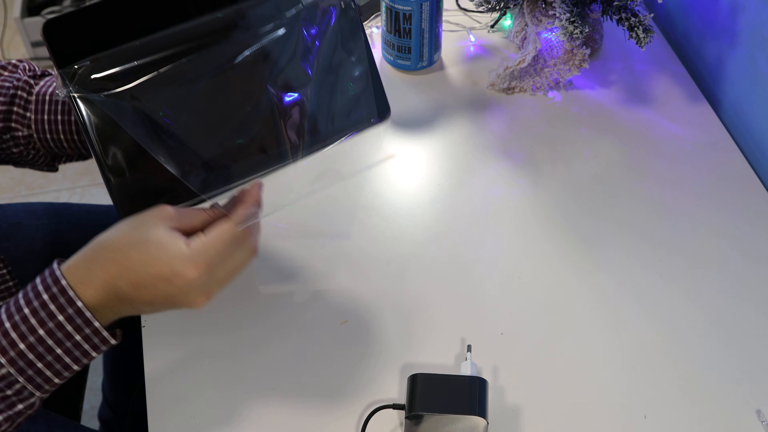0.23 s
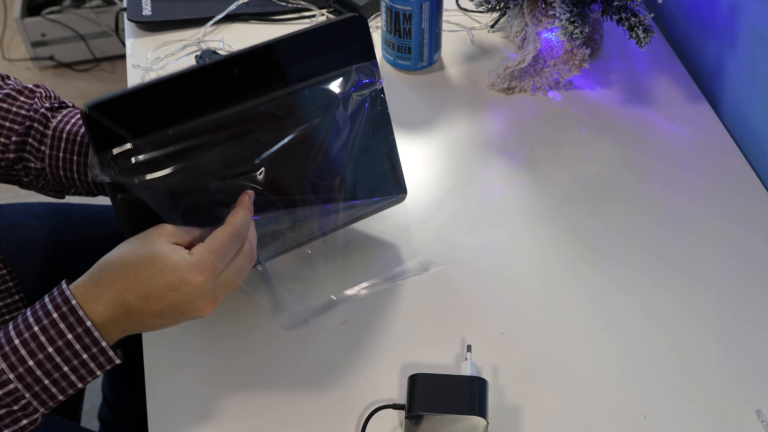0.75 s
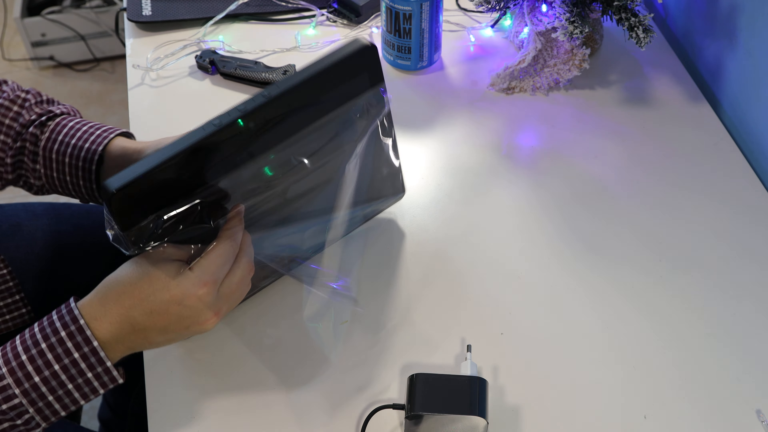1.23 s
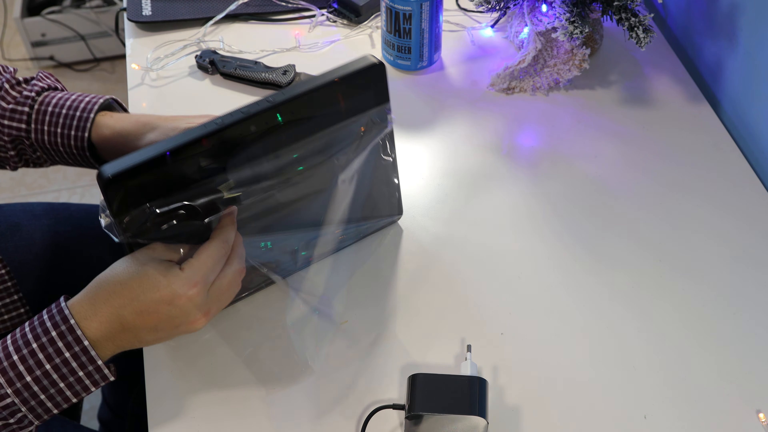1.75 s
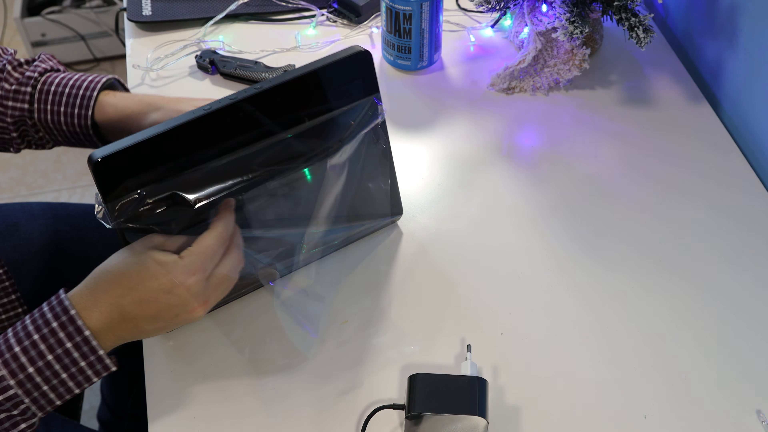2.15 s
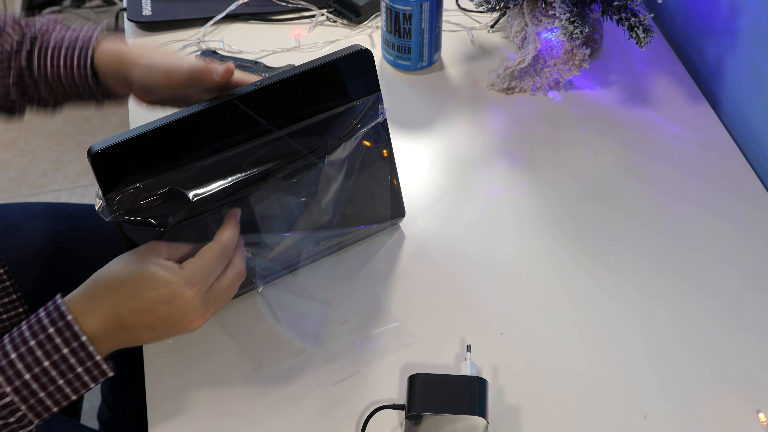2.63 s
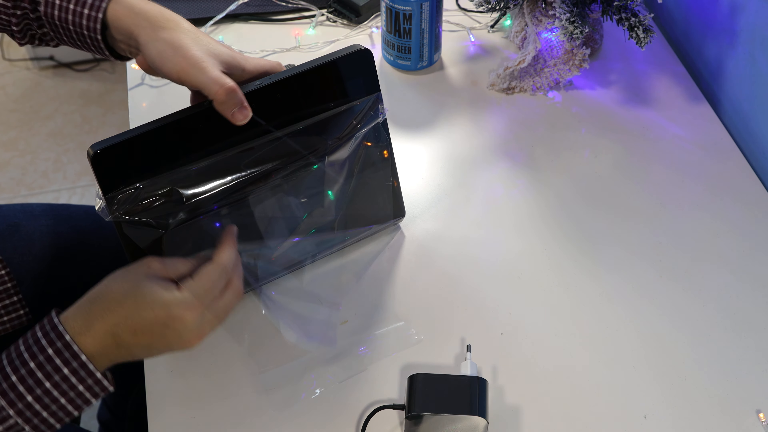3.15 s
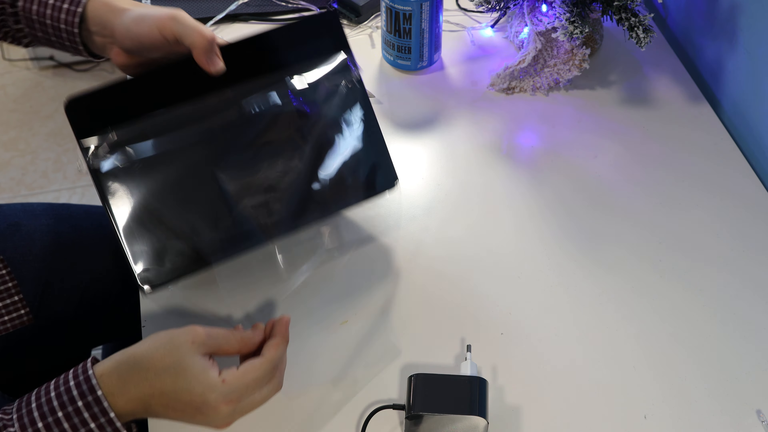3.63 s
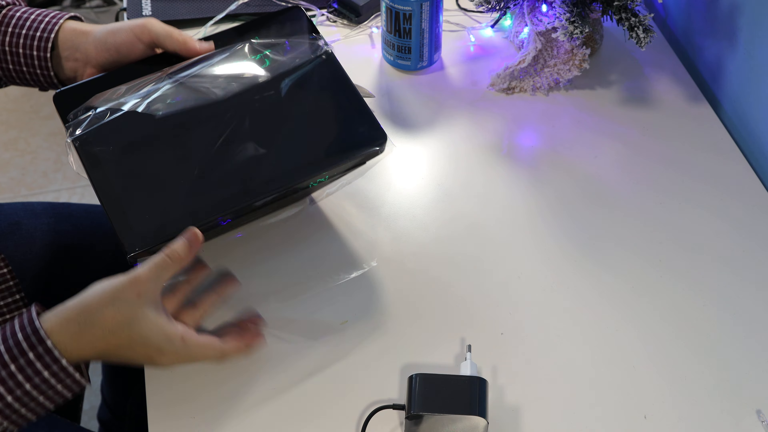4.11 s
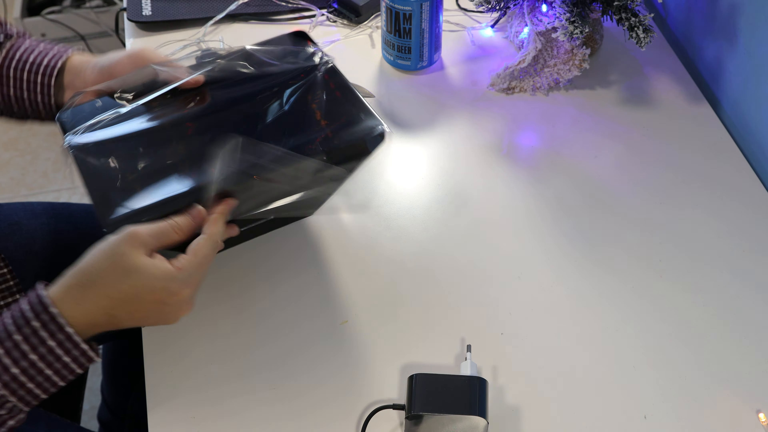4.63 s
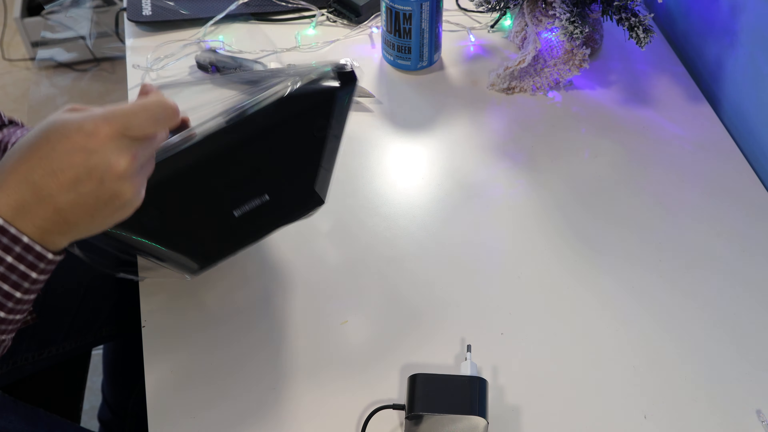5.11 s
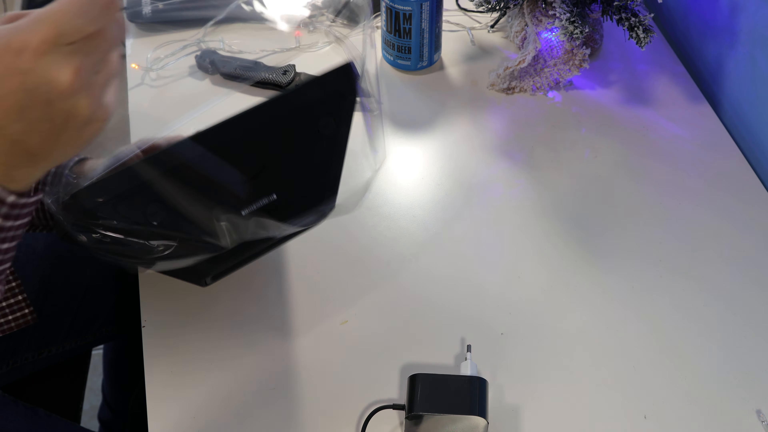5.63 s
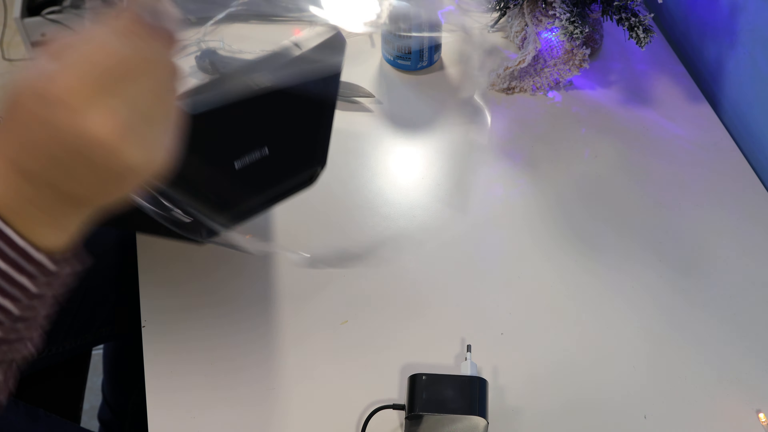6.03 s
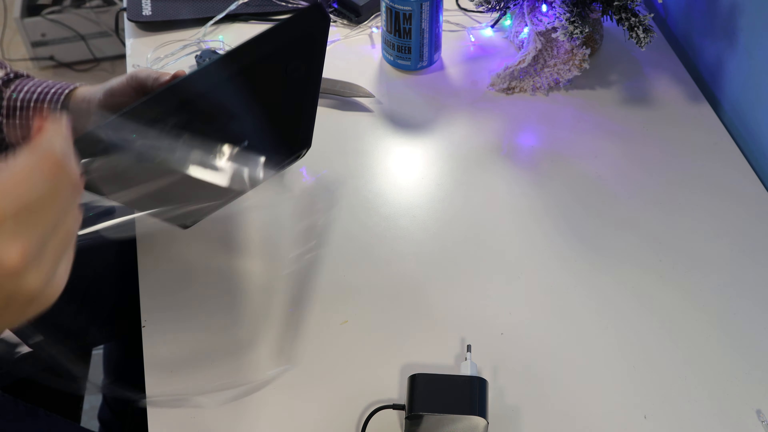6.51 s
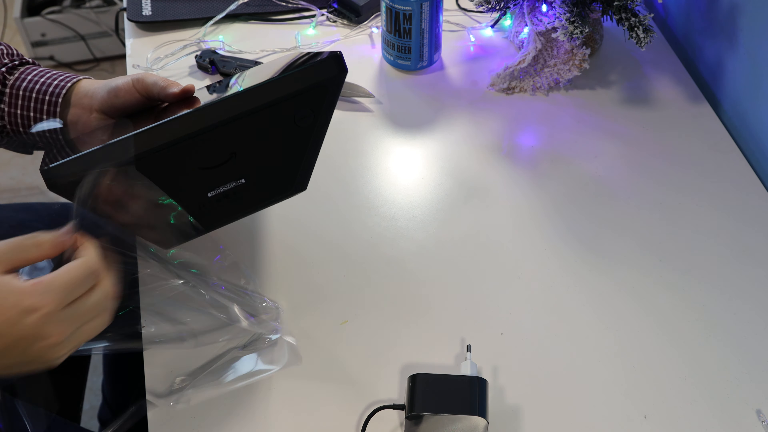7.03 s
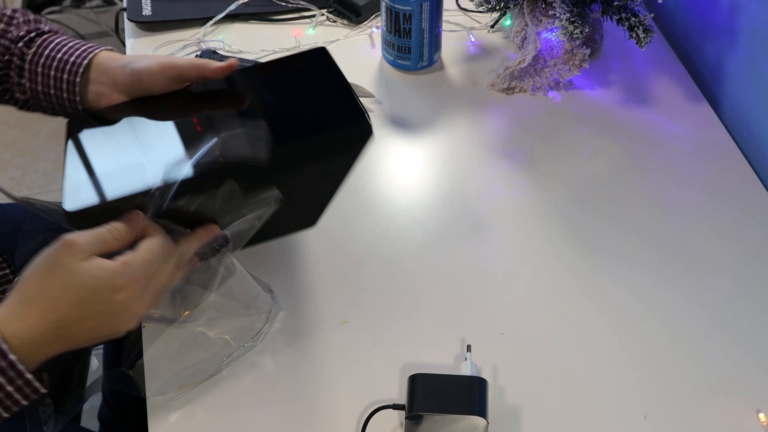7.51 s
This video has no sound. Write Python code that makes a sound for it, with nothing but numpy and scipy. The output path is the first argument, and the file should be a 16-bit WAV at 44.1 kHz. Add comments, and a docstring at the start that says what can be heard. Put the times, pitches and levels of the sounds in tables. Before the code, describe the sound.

Stiff plastic film crackles and snaps in irregular bursts as it is peeled off a tablet, with a few dull knocks on a desk.

```python
"""Stiff plastic film is peeled off a tablet held over a desk, in a small, lively room.
From the start: faint steady room noise, a rustle of clicks and hiss that follows the hands' pull,
and hollow rasps of slips ringing a bending mode. Soon after: creases snap in runs of tiny jumps.
From 1.26 s: now and then the tablet knocks on the desk, a soft blow on ringing modes, thud and boom.
Film and knocks also pass through a tail of dense decaying reflections."""
import sys
import numpy as np
from scipy import signal
from scipy.fft import rfft, irfft
from scipy.io import wavfile
from scipy.ndimage import uniform_filter1d

SR = 44100
rng = np.random.default_rng(int(sys.argv[2]) if len(sys.argv) > 2 else 0)


def wav_out(sig):
    """Save sig, one row per channel (or a flat mono array), as 16-bit PCM at SR to the path in sys.argv[1]."""
    wavfile.write(sys.argv[1], SR, np.round(np.clip(np.atleast_2d(sig).T, -1, 1) * 32767).astype(np.int16))


N = 342216

# room noise spectrum: (frequency [Hz], relative density [dB])
AIR_SPECTRUM = [(20, -11), (150, 0.5), (1000, -7.5), (2300, -22), (14000, -20)]
# left-right likeness of diffuse sound: (frequency [Hz], correlation [-1..1])
LIKENESS = [(150, 1), (650, 0.92), (1100, 0.86), (2000, 0.24), (6000, -0.33)]
# hand pulls or shifts the film: (start [s], length [s], relative level [dB], treble over 6 kHz [dB])
PULLS = [(0.0, 0.0049, -34.5, 6), (0.421, 0.26, -54, -3.5), (0.771, 0.071, -49, -18), (1, 0.043, -40, -8),
         (1.259, 0.089, -55, 1.5), (1.468, .1, -41, 3.5), (1.684, 0.083, -47.5, 4.5),
         (1.877, .05, -45.5, 1.5), (1.975, 0.05, -40.5, 7), (2.02, .03, -37, -4), (2.338, 0.061, -46, -3),
         (2.559, 0.14, -49.5, 6), (2.892, 0.024, -49, -0.5), (3.224, 0.1, -50, 2.5),
         (3.873, 0.052, -47.5, -32), (4.122, .6, -41.5, 3), (4.258, 0.05, -43, 10), (4.84, 0.36, -48, 7),
         (5.059, 0.032, -31, 10.5), (5.422, .1, -45, 9), (5.525, 0.13, -29.5, 6.5),
         (5.833, 0.098, -39.5, -1), (6.26, .05, -63.5, -13), (6.443, 0.14, -60.5, -16),
         (6.715, 0.13, -48, 6), (6.945, 0.066, -35, 8), (7.196, 0.13, -33.5, -0.5),
         (7.53, 0.14, -38.5, 3.5)]
# radiation of the film: (frequency [Hz], relative density [dB])
FILM_SPECTRUM = [(40, -31.5), (120, -9), (280, -4), (550, -1), (760, 3.5), (1300, 3), (2000, 5),
                 (2800, 3.5), (4000, 3.5), (6000, -1.5), (10000, -7.5), (16000, -9.5)]
# a panel flexes with a short hollow rasp: (time [s], relative level [dB], pitch [Hz])
FLEXES = [(0.0, -36, 710), (0.44, -45, 610), (2.609, -44, 3980), (2.884, -44, 590), (2.933, -56, 830),
          (3.368, -33, 1490), (3.667, -32, 1820), (3.746, -32.5, 1230), (4.301, -29.5, 1300),
          (4.476, -34, 895), (4.865, -30.5, 716), (5.056, -29, 1240), (5.559, -18.5, 2020),
          (6.56, -50, 535)]
# room tail decay: (frequency [Hz], t60 [s])
ROOM_T60 = [(200, 0.71), (2000, 0.52), (5000, .5), (14000, 0.52)]
# room tail level: (frequency [Hz], level against the direct sound [dB])
ROOM_GAIN = [(100, 6), (400, 6), (800, -1.5), (2000, -2), (5000, -3), (14000, -5.5)]
# creases that buckle:
# (time [s], relative level [dB], panel pitch [Hz], treble over 6 kHz [dB], buckling run [s])
SNAPS = [(0.1427, -29.5, 2980, 16, 0.0024), (0.2352, -36, 714, -16, 0.0023),
         (0.485, -40.0, 650, -11, 0.003), (0.7832, -41.5, 5330, -10, 0.0018),
         (0.8823, -20.5, 2360, 6.5, 0.0021), (1.0026, -31.5, 2720, 2, 0.0064),
         (1.0356, -26.5, 3180, -3, 0.0022), (1.1047, -36, 2840, 5.5, 0.0031),
         (1.3957, -29, 690, -4, 0.0058), (1.489, -36.5, 2840, -1.0, 0.0025),
         (1.6159, -33, 3390, 8.5, 0.0021), (1.8649, -36.5, 1820, -6, 0.0043), (1.9689, -26, 3420, 3, 0.01),
         (2.0239, -26, 644, 10, 0.009), (2.1103, -30, 3940, 7, 0.002), (2.254, -44, 5340, 17, 0.0034),
         (2.632, -34.5, 4900, -19, 0.003), (2.6959, -33, 1980, -5, 0.0071), (2.937, -28, 680, -8.5, 0.0026),
         (3.3186, -37.5, 5300, -16.0, 0.003), (3.3548, -31.5, 1450, -5, 0.0041),
         (3.378, -27, 1450, -1.5, 0.0053), (3.5616, -40, 1690, -26.0, 0.002), (3.6738, -24, 1820, 4, 0.004),
         (3.6779, -22.5, 1940, -11, 0.0026), (3.751, -24.5, 1570, 9.5, 0.0024),
         (3.914, -34, 750, -18, 0.00088), (3.924, -33.5, 2620, -0.5, 0.0016),
         (4.0981, -25, 2560, -3, 0.0027), (4.1618, -32.5, 850, -4, 0.0035), (4.2116, -35, 4850, -9, 0.0013),
         (4.284, -33, 2800, -3.5, 0.0032), (4.294, -26.5, 4270, 2, 0.0018),
         (4.3224, -31.5, 2970, 0, 0.0029), (4.365, -30.5, 3100, 4, 0.00223),
         (4.4926, -29.5, 5530, -2, 0.0034), (4.5414, -25.5, 2710, 11, 0.0016),
         (4.5997, -34, 5300, -6, 0.0012), (4.64, -31, 790, -2, 0.0022), (4.65, -28.5, 5400, -6, 0.0022),
         (4.6739, -32.5, 2590, -2, 0.0025), (4.8472, -20, 4530, 2, 0.0015),
         (4.9241, -22.5, 2560, 11.5, 0.0026), (4.9906, -27, 4430, 5, 0.0084),
         (5.0007, -24.5, 3550, 2.0, 0.0022), (5.025, -28, 2110, 6, 0.0027),
         (5.0701, -15.5, 1720, 6.5, 0.0074), (5.198, -29, 2710, -20, 0.0013),
         (5.3053, -38, 2970, 3.5, 0.0017), (5.3744, -35.5, 1360, -8.5, 0.0068),
         (5.4665, -30, 640, -7.5, 0.0034), (5.5138, -41, 3550, 19.5, 0.0028),
         (5.645, -32, 1660, 18, 0.0062), (5.6634, -20.5, 2030, -8.0, 0.0036),
         (5.696, -22.5, 4240, 4, 0.0024), (5.9296, -30, 5530, 4, 0.0042),
         (6.0517, -36.5, 3270, 5.5, 0.0032), (6.487, -43.5, 3060, -42, 0.0015),
         (6.6802, -26, 2840, -2, 0.00291), (6.719, -21, 2010, -2.5, 0.0043),
         (6.7541, -25.5, 3370, -8, 0.0034), (6.91, -35, 2590, 3, 0.005), (6.9451, -29, 3130, 11.5, 0.0024),
         (6.985, -29, 1760, 11.5, 0.0027), (7.108, -24.5, 5600, -16, 0.0018),
         (7.213, -30, 644, -13, 0.0027), (7.268, -31, 646, -1, 0.0019), (7.289, -25, 1640, 5.5, 0.0016),
         (7.3106, -21.5, 2840, 4.5, 0.0047), (7.356, -30.5, 2970, 14.5, 0.0021),
         (7.4623, -33.5, 2250, 3, 0.003), (7.486, -29.5, 2050, -5, 0.0011), (7.5223, -25, 4550, 7, 0.0025),
         (7.5585, -28.5, 2180, 5.5, 0.0026), (7.637, -19.5, 5170, -1, 0.0046),
         (7.648, -23, 5230, 4.5, 0.0031)]
# tablet meets the desk or rebounds:
# (time [s], relative level [dB], softness as a low-pass corner [Hz], relative sub-bass [dB])
KNOCKS = [(1.259, -21, 444, -32), (1.466, -7, 725, -32), (1.498, -16, 600, -33), (1.541, -19.5, 606, -35),
          (2.07, -15, 227, -1), (2.341, -24, 260, 4), (2.377, -21, 170, 4), (4.05, -29, 355, 4),
          (4.127, -28, 600, -7), (5.06, -30, 895, -1), (6.67, -38, 607, -12)]
# desk and tablet modes: (frequency [Hz], relative level [dB], t60 [s])
DESK_MODES = [(109.8, 3, 0.23), (167, -0.5, 0.34), (199, 1, 0.38), (246.8, 5.5, 0.18), (312, 6.5, 0.18),
              (311, -20, 1.4), (364, 5, .18), (414, 0, 0.22), (441.7, 4, 0.34), (503.4, -1, .2),
              (678.5, 4, 0.29), (800, 0, 0.21), (1145, -6, 0.13)]
# dull thud of a knock: (frequency [Hz], relative density [dB])
THUD_SPECTRUM = [(30, -47), (105, 0), (300, 2.5), (500, 4.5), (1400, -3), (4000, -23.5)]

HISS_GAIN = .3  # smooth sliding against the clicks
CATCH_DB = -59  # a gentler pull slides smoothly, a harder one catches on the creases
# a pull takes up the slack, eases while it lasts, then lets the film settle
TAKE_UP_DB_PER_S, EASE_DB_PER_S, SETTLE_DB_PER_S = 542, 7.5, 245.5
# a snap shakes the creases around it: level against the snap's, treble, decay
SHAKE_DB, SHAKE_TREBLE_DB, SHAKE_DB_PER_S = -26, -17.5, 157
HELD_DB, HELD_TREBLE_DB = -66, 6.5  # held film never lies quite still
EDGE_HZ = 16100  # band limit


def amp(db):
    """Decibels to gain."""
    return 10 ** (np.asarray(db) / 20)


def unit(x):
    """Scales to an rms of one."""
    return x / np.sqrt(np.mean(x ** 2) + 1e-20)


def read(points, hz):
    """Interpolates a curve on a log-frequency axis."""
    f, value = np.transpose(points)
    return np.interp(np.log(hz + 1), np.log(f + 1), value)


def bins(size):
    """Frequencies of a real transform [Hz]."""
    return np.fft.rfftfreq(size, 1 / SR)


def add(mix, start_s, sound):
    """Mixes a sound in at a time."""
    part = mix[:, max(round(start_s * SR), 0):][:, :sound.shape[-1]]
    part += sound[..., :part.shape[1]]


def causal(gain):
    """Minimum-phase response of a gain curve: nothing sounds before the click."""
    log = np.log(np.maximum(gain, 1e-5))
    mirrored = np.r_[log, log[-2:0:-1]]
    return np.exp(np.conj(signal.hilbert(mirrored)))[:len(gain)]


def diffuse(pair):
    """Spectra of two unrelated signals, mixed to the left-right correlation of LIKENESS."""
    a, b = rfft(pair)
    same = np.clip(read(LIKENESS, bins(pair.shape[1])), -1, 1)
    mid = a * np.sqrt((1 + same) / 2)
    side = b * np.sqrt((1 - same) / 2)
    return np.array([mid + side, mid - side])


def treble_share(hz, corner_hz=6000):
    """Rises from zero to one around the corner."""
    return 1 - 1 / (1 + (hz / corner_hz) ** 5)


def resonance(hz, pitch_hz, sharpness):
    """Complex response of one damped mode."""
    return 1 / (1 + 1j * sharpness * (hz / pitch_hz - pitch_hz / hz))


def air(level_db=-59):
    """Steady faint noise of the room, shaped by its spectrum."""
    noise = diffuse(rng.standard_normal((2, N)))
    return amp(level_db) * unit(irfft(noise * amp(read(AIR_SPECTRUM, bins(N)))))


def effort(step_size=32):
    """Rustle level and treble gain over time: powers of pulls, shakes and held film add up."""
    t = np.arange(0, N, step_size) / SR
    parts = [(np.full(len(t), HELD_DB), HELD_TREBLE_DB)]
    for start_s, length_s, db, treble_db in PULLS:
        age_s = t - start_s
        drop_db = TAKE_UP_DB_PER_S * np.maximum(-age_s, 0)
        drop_db += EASE_DB_PER_S * np.clip(age_s, 0, length_s)
        drop_db += SETTLE_DB_PER_S * np.maximum(age_s - length_s, 0)
        parts.append((db - drop_db, treble_db))
    for start_s, db, *_ in SNAPS:
        shake_db = db + SHAKE_DB - SHAKE_DB_PER_S * (t - start_s)
        parts.append((np.where(t < start_s, -np.inf, shake_db), SHAKE_TREBLE_DB))
    power = sum(amp(db) ** 2 for db, _ in parts)
    treble = sum(amp(db + treble_db) ** 2 for db, treble_db in parts) / power
    return [np.interp(np.arange(N) / SR, t, np.sqrt(p)) for p in (power, treble)]


def ticks(per_s, spread_db):
    """Random clicks, mostly small and a few larger, each with its own left-right balance."""
    at = np.flatnonzero(rng.random(N) < per_s / SR)
    chance, side = rng.random(N)[at], 2 * rng.random(N)[at] - 1
    height = amp(spread_db * np.minimum(-np.log(chance), 4))
    out = np.zeros((2, N))
    out[:, at] = height * (1 + side * np.array([[1], [-1]]))
    return unit(out)


def facets(per_s=60, spread_db=4.0, sharpness=3.4, count=14):
    """Small facets between the creases, each clicking at its own pitch for a few cycles."""
    hz = bins(N) + 1
    rings = np.array([resonance(hz, f, sharpness) for f in np.geomspace(650, 8000, count)])
    clicks = sum(rfft(ticks(per_s, spread_db)) * ring for ring in rings)
    return clicks / np.sqrt((abs(rings) ** 2).sum(0).max())


def crackles(per_s=60, spread_db=0.5, run_s=0.0051, top_hz=7000):
    """Slips set off their neighbours: noise bursts decaying over a few milliseconds."""
    runs = signal.lfilter([1], [1, -np.exp(-1 / (run_s * SR))], ticks(per_s, spread_db))
    slips = irfft(diffuse(rng.standard_normal((2, N))))
    return rfft(unit(runs * slips)) / (1 + 1j * bins(N) / top_hz)


def rustle(crackle_gain=0.98, level_db=8.0):
    """Ringing facets and dry crackles over the hiss of film sliding on film."""
    (level, treble), hz = effort(), bins(N)
    caught = level ** 2 / (level ** 2 + amp(CATCH_DB) ** 2)
    clicks = rfft(caught * irfft(facets() + crackle_gain * crackles()))
    hiss = HISS_GAIN * diffuse(rng.standard_normal((2, N)))
    z = (clicks + hiss) * causal(amp(read(FILM_SPECTRUM, hz)))
    high = treble_share(hz)
    sheet = irfft(z * (1 - high)) + irfft(z * high) * treble
    # level out the short-term strength, so that effort alone sets it
    strength = np.sqrt(uniform_filter1d(np.mean(unit(irfft(z)) ** 2, 0), size=3000))
    return sheet / strength * level * amp(level_db)


def flexes(sharpness=3, swell_s=0.015, per_s=900, level_db=0, size=8192):
    """A swell of tiny slips rings one damped bending mode of the sheet."""
    out, hz = np.zeros((2, N)), bins(size) + 1
    u = np.arange(size) / SR / swell_s
    for start_s, db, pitch_hz in FLEXES:
        slips = diffuse(rng.standard_normal((2, size)) * (rng.random(size) < per_s / SR))
        rasp = unit(irfft(slips * resonance(hz, pitch_hz, sharpness)))
        add(out, start_s, amp(db + level_db) * rasp * u * np.exp(1 - u))
    return out


def room(x, first_s=0.0015, size=32768):
    """Dense reflections fade in around first_s and decay at a rate set by frequency."""
    taps = rng.standard_normal((2, size)) * (rng.random((2, size)) < .2)
    hz, t, z = signal.stft(unit(irfft(diffuse(taps))), SR, nperseg=256)
    t60 = np.maximum(read(ROOM_T60, hz), .05)[:, None]
    z = z * amp(read(ROOM_GAIN, hz)[:, None] - 60 * t / t60)
    z = z * np.sqrt(2 * np.log(1000) / (t60 * SR))  # unit energy of the decay
    onset = np.clip(np.arange(size) / SR / first_s - .5, 0, 1)
    tail = signal.istft(z, SR, nperseg=256)[1][:, :size] * onset
    return signal.fftconvolve(x, tail, axes=1)[:, :N]


def snaps(ring_db=6.0, ring_octaves=0.63, shed_db=-6, shed_share=0.2, lag_s=.00004, flutter_gain=0.95,
          apart=0.21, swell=0.11, fade=0.51, linger=2.25, level_db=0, size=2048, count=8):
    """A crease gives way in a run of tiny jumps; the panel beside it flutters around its pitch."""
    out, hz, t = np.zeros((2, N)), bins(size), np.arange(size) / SR
    for start_s, db, pitch_hz, treble_db, run_s in SNAPS:
        run_s = max(run_s, .001)
        when = (np.arange(count) + rng.random(count)) / count  # share of the run
        height = rng.standard_normal((2, count))
        lag = rng.normal(0, lag_s, count)  # right against left
        height = np.sign(height[0]) + apart * height[1] * np.array([[1], [-1]])
        height = height * (1 - np.exp(-when / swell)) * np.exp(-when / fade)
        arrive_s = when * run_s + np.array([0 * lag, lag])
        jumps = (height[..., None] * np.exp(-2j * np.pi * hz * arrive_s[..., None])).sum(1)
        envelope = np.exp(-t / (linger * run_s)) * (1 - np.exp(-t / (swell * run_s)))
        flutter = diffuse(rng.standard_normal((2, size)) * envelope)
        z = jumps / np.sqrt(np.mean(abs(jumps) ** 2))
        z = z + flutter_gain * flutter / np.sqrt(np.mean(abs(flutter) ** 2))
        # the run ripples the spectrum finely; the sheet sets its broad shape
        broad = np.sqrt(uniform_filter1d(np.mean(abs(z) ** 2, 0), size=70))
        # the panel resonates at its pitch and radiates less far below it
        panel_db = ring_db / (1 + (np.log2((hz + 1) / pitch_hz) / ring_octaves) ** 2)
        panel_db += shed_db / (1 + (hz / (shed_share * pitch_hz)) ** 4)
        colour = amp(read(FILM_SPECTRUM, hz) + panel_db + treble_db * treble_share(hz))
        fade_out = np.minimum(2 - 2 * t / t[-1], 1)
        crack = irfft(z * causal(colour / broad)) * fade_out
        add(out, start_s, amp(db + level_db + 30) * crack)  # +30 dB: transform scaling
    return out


def knocks(ring_db=-9.0, thud_db=-3.0, thud_s=0.022, sub_hz=65, sub_t60_s=0.69, sub_db=-15, size=32768):
    """A soft blow sets the desk's modes ringing, with a dull thud and a low boom of the whole top."""
    out, hz, t = np.zeros((2, N)), bins(size), np.arange(size) / SR
    ring = np.zeros(size)
    for k, (f, db, t60_s) in enumerate(DESK_MODES):
        ring += amp(db - 60 * t / t60_s) * np.sin(2 * np.pi * f * t) * (-1) ** (k // 2)
    boom = amp(sub_db - 60 * t / sub_t60_s) * np.sin(2 * np.pi * sub_hz * t)
    settle = (1 + t / thud_s) * np.exp(-t / thud_s)  # the tablet judders, then lies still
    for start_s, db, soft_hz, boom_db in KNOCKS:
        judder = irfft(diffuse(rng.standard_normal((2, size))) * amp(read(THUD_SPECTRUM, hz)))
        thud = amp(thud_db) * unit(judder * settle) * np.sqrt(np.mean(settle ** 2))
        blow = causal(1 / (1 + (hz / soft_hz) ** 2) ** 0.95)
        body = amp(ring_db) * ring + thud + amp(boom_db) * boom
        add(out, start_s, amp(db) * irfft(rfft(body) * blow))
    return out


def scene(right_db=0.36, knock_wet_db=-14):
    """Film a little louder on the right, desk in the middle, both with the room's tail, over air."""
    film = (rustle() + flexes() + snaps()) * amp([[-right_db], [right_db]])
    film[1] = np.roll(film[1], 2)  # samples: the left microphone is a little nearer
    desk = knocks()
    return air() + film + desk + room(film + amp(knock_wet_db) * desk)


def record(dry, low_cut_hz=62):
    """The microphone sheds the deepest bass, the loudest peaks round off; then the band limit."""
    thin = signal.sosfilt(signal.butter(2, low_cut_hz, "high", fs=SR, output="sos"), dry)
    edge = signal.firwin(255, EDGE_HZ, window=("kaiser", 8), fs=SR)
    return signal.oaconvolve(np.tanh(thin), edge[None], "same", axes=1)


dry = scene()
out = record(dry)
wav_out(out)
```